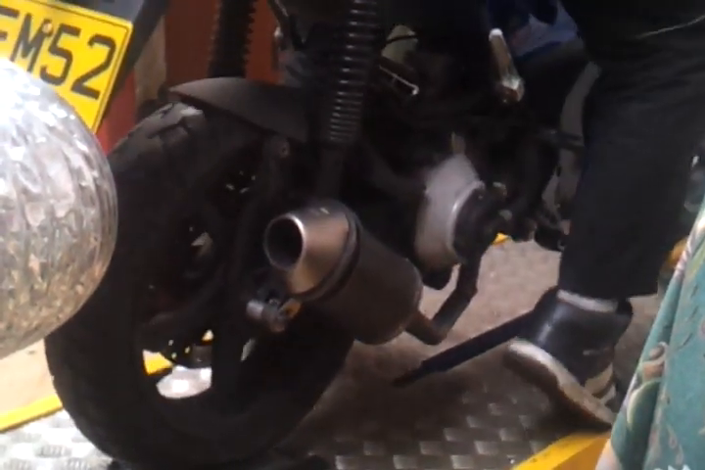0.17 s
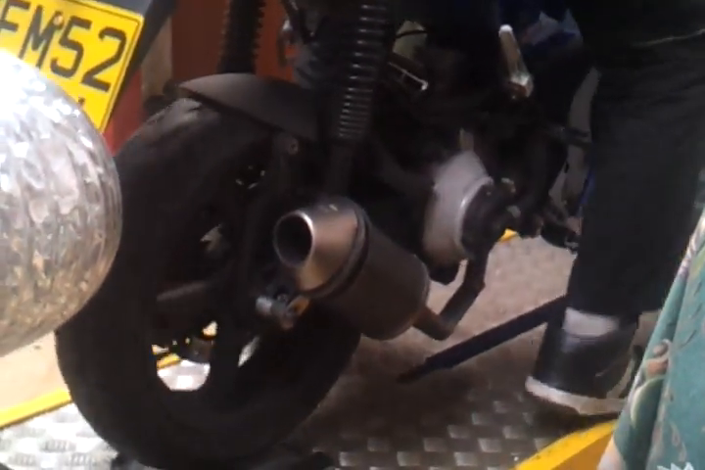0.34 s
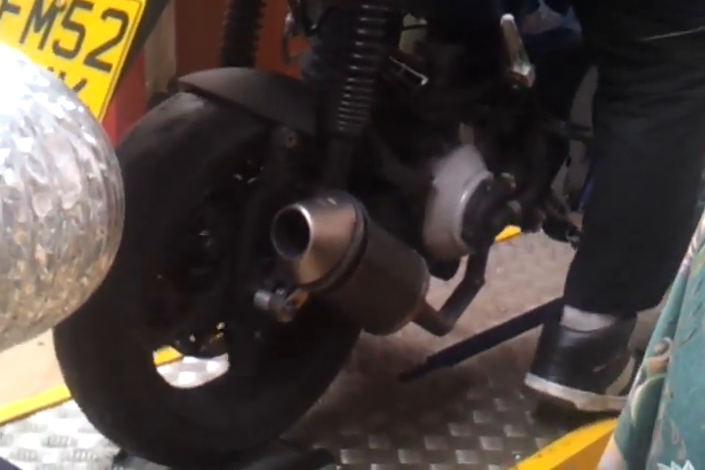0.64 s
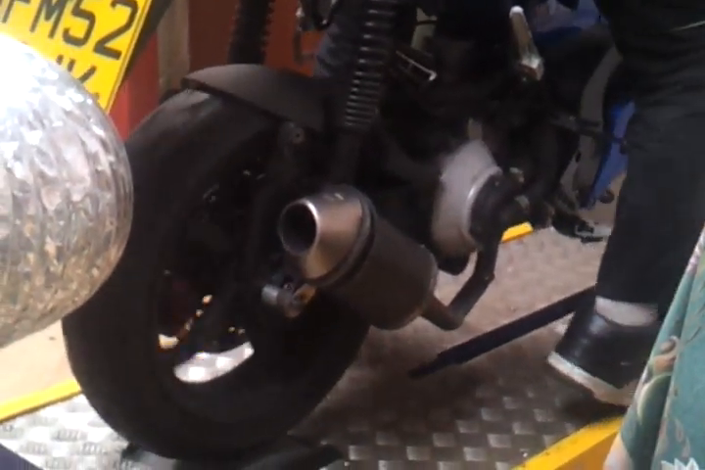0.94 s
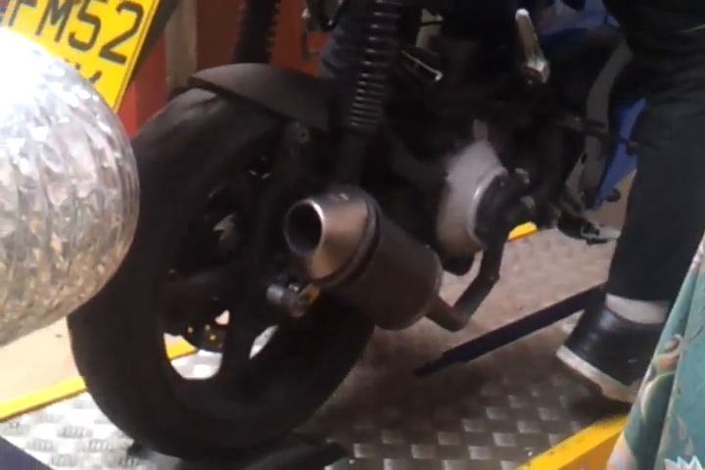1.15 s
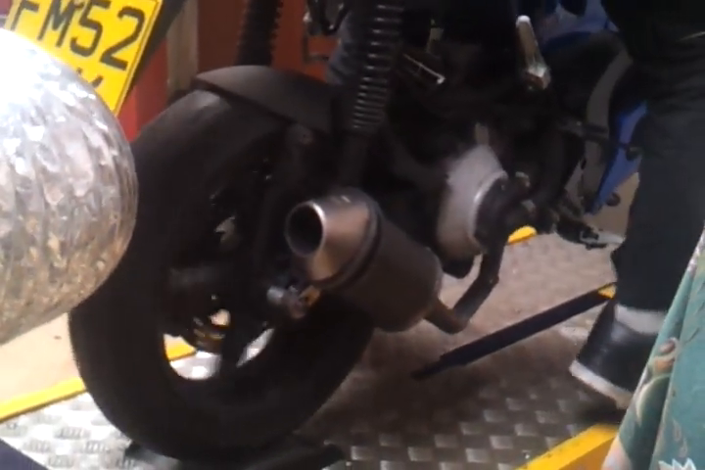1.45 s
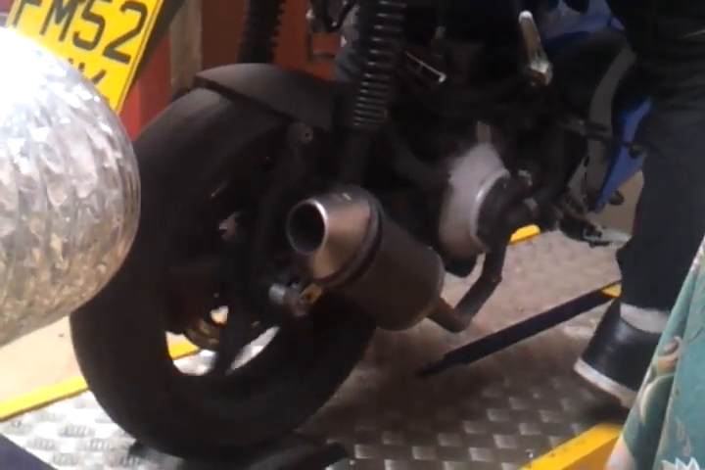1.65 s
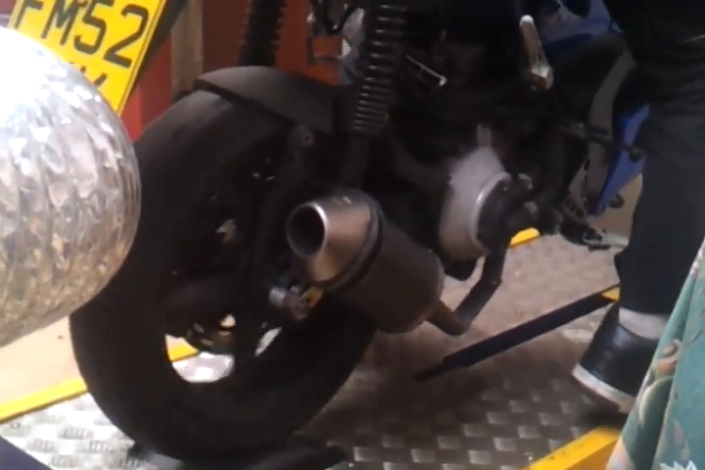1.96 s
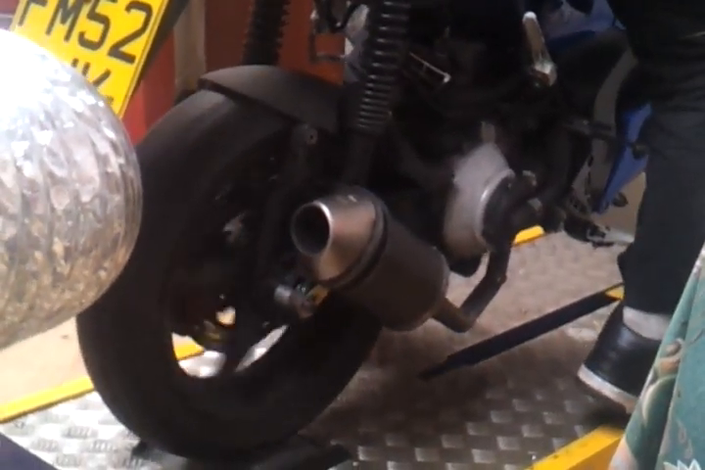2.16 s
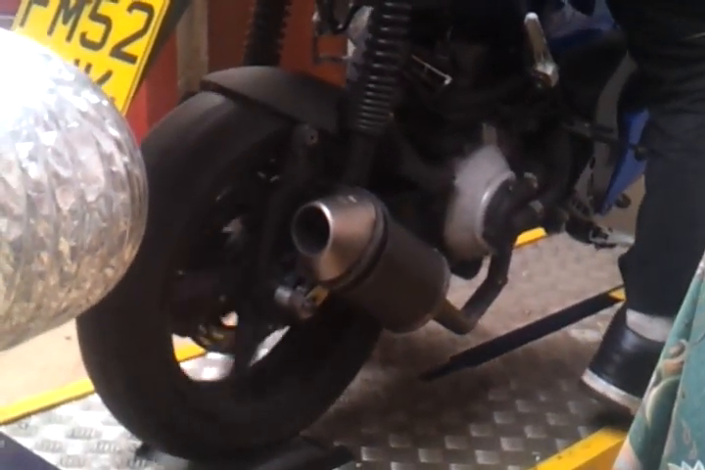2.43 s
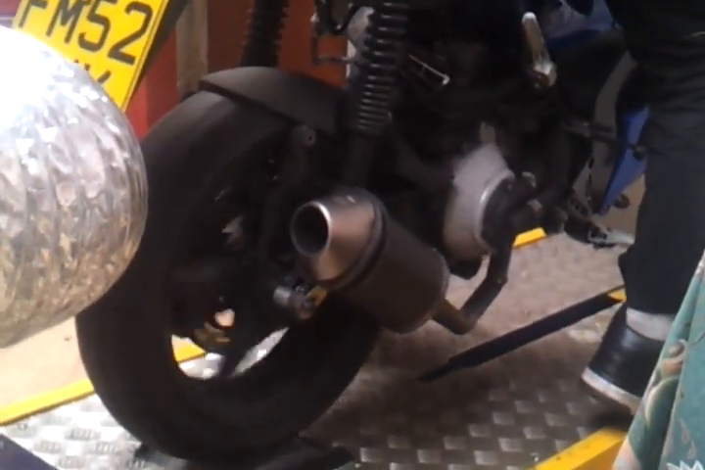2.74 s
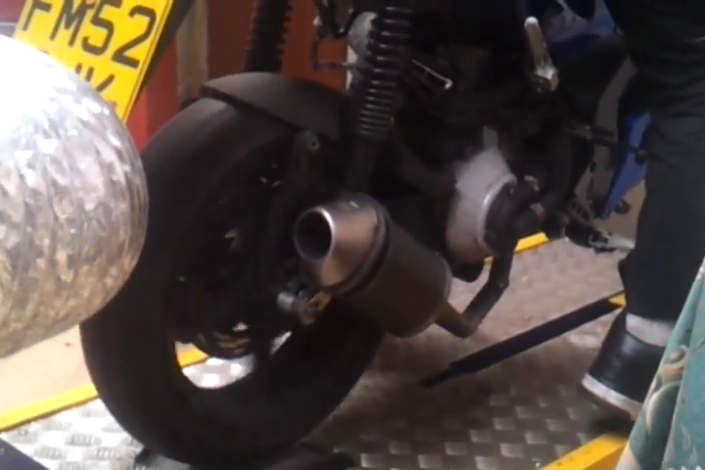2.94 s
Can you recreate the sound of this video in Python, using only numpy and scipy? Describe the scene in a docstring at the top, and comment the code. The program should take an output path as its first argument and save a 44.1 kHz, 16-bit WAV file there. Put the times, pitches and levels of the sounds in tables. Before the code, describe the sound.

A parked motorcycle is revved in four short harsh bursts, dropping to chugging idle between them.

```python
"""A parked single-cylinder motorcycle starts near idle, is blipped four times and sinks back in between.
In each cycle the firing rings the exhaust and lets out a puff of gas, the intake gulps in mid-cycle and
the valves tick; around each blip's start the intake hisses, then the upper exhaust resonances take over.
The microphone is close to the silencer and heavily overloaded, so the revs turn into a harsh rasp."""
import sys
import numpy as np
from scipy import signal
from scipy.fft import rfft, irfft
from scipy.io import wavfile

SR = 44100
rng = np.random.default_rng(int(sys.argv[2]) if len(sys.argv) > 2 else 0)


def file_out(sig):
    """Save sig as 16-bit WAV at sys.argv[1]."""
    # one column per channel
    cols = np.atleast_2d(sig).T
    # limit, then scale
    lim = np.clip(cols, -1, 1)
    pcm = np.round(lim * 32767).astype(np.int16)
    wavfile.write(sys.argv[1], SR, pcm)


N = 136710

# engine speed: (time [s], firings [1/s])
FIRING_RATE = [(0.0, 17.6), (0.24, 17.95), (0.33, 40.3), (0.42, 48.38), (0.53, 47.35), (0.62, 37),
               (0.72, 31.8), (0.8, 24.8), (0.96, 19.7), (1.21, 19.66), (1.31, 39.8), (1.4, 57.9),
               (1.5, 49.8), (1.58, 42.6), (1.72, 29.7), (1.84, 21.6), (2.01, 23.3), (2.12, 43.36),
               (2.24, 48.7), (2.39, 36.6), (2.48, 31.4), (2.6, 21.5), (2.77, 19.8), (2.86, 41.5),
               (2.95, 55.0), (3.1, 43.3)]
# throttle blips: (opens [s], closes [s], exhaust boost [dB], gas boost [dB])
THROTTLE_BLIPS = [(0.239, 0.504, 9, 17.5), (1.203, 1.5, 10.5, 22), (1.991, 2.269, 10.5, 21),
                  (2.765, 3.041, 12.5, 23)]
# exhaust resonances: (centre [Hz], width [Hz], level off throttle [dB], extra at full load [dB])
PIPE_MODES = [(136.6, 19.6, 2.5, -10.5), (209, 32.6, -3, -5.5), (266.6, 27.2, -3.5, -4.5),
              (376, 32, -16.5, 6), (469.7, 94, -22.5, 7.5), (621, 253, -18.5, 6.5), (1390, 900, -30, 10)]
# gas noise spectrum: (frequency [Hz], relative density [dB])
GAS_SPECTRUM = [(30, -22.5), (100, -2), (250, 3.5), (550, -2.5), (900, -11.5), (1600, -9.5), (2600, -16.5),
                (4500, -18.5), (6500, -23.5), (9000, -23.5)]
# valve train noise spectrum: (frequency [Hz], relative density [dB])
VALVE_SPECTRUM = [(300, 8), (900, 4), (1700, -6.5), (2600, -6), (4300, -10), (5600, 2.5), (6600, -2),
                  (9000, -6)]
# valve train knocks: (place in cycle [0-1], level [dB])
VALVE_KNOCKS = [(.14, -2), (0.421, -4.5), (0.621, -13), (.88, -10.5)]
# air sucked in as the throttle snaps open: (start [s], decay time [s], level [dB])
INTAKE_GASPS = [(0.224, .05, -14), (1.194, 0.043, -13), (2.016, 0.044, -11), (2.795, 0.039, -8)]
# intake hiss spectrum: (frequency [Hz], relative density [dB])
GASP_SPECTRUM = [(800, -9.5), (3500, -4), (6300, -1), (9000, -25)]

START_CYCLES = 0.58
OPEN_S, RELEASE_S = 0.096, 0.16
SCATTER_DB, JITTER_S = 2.5, 0.0005  # standard deviations per stroke
EXHAUST_DB, INTAKE_DB, INTAKE_PLACE_CYCLES = 58.5, -9.5, 0.48
GAS_DB, PUFF_S, GAS_STEADY_GAIN = -8.5, 0.008, 0.33
VALVE_DB, VALVE_LOAD_DB, KNOCK_S, VALVE_STEADY_GAIN = -16.5, 15.5, 0.0041, 0.62
DRIVE_DB, CEILING = 6, 0.72
CONVERTER_HZ, LEAK_DB, KNEE_POWER, TOP_HZ = 7000, -31, 8.7, 15750


def exhaust(pulses, load):
    """Pressure pulses ring the pipe; under load the upper resonances take over from the boom."""
    out = np.zeros(N)
    for centre_hz, width_hz, level_db, extra_db in PIPE_MODES:
        gain = undb(EXHAUST_DB + level_db + extra_db * load)
        out += resonate(pulses * gain, centre_hz, width_hz)
    return out


def gas(firings, boost_db):
    """Turbulent noise: a decaying puff after each firing, over a steady flow."""
    flow = fade(firings, PUFF_S) + GAS_STEADY_GAIN
    return noise(GAS_SPECTRUM) * flow * undb(GAS_DB + boost_db)


def valves(turns, load):
    """Impacts as decaying noise over the whirr of the cam chain; both grow with load."""
    knocks = sum(undb(level_db) * strokes(turns, place) for place, level_db in VALVE_KNOCKS)
    envelope = fade(knocks, KNOCK_S) + VALVE_STEADY_GAIN
    return noise(VALVE_SPECTRUM) * envelope * undb(VALVE_DB + VALVE_LOAD_DB * load)


def gasps(t):
    """Inrushing air hisses around the start of each blip: abrupt onset, exponential decay."""
    level = np.zeros(N)
    for start_s, decay_s, level_db in INTAKE_GASPS:
        level += undb(level_db) * (t > start_s) * np.exp(-np.abs(t - start_s) / decay_s)
    return level * noise(GASP_SPECTRUM)


def throttle(t):
    """Load (about 0-1), exhaust boost [dB], gas boost [dB]: each blip ramps open, holds, dies away."""
    controls = np.zeros((3, N))
    for opens_s, closes_s, exhaust_db, gas_db in THROTTLE_BLIPS:
        ramp = np.clip((t - opens_s) / OPEN_S, 0, 1)
        release = np.exp(-np.maximum(t - closes_s, 0) / RELEASE_S)
        controls += np.outer([1, exhaust_db, gas_db], ramp * release)
    return controls


def strokes(turns, place):
    """One impulse per cycle at the given place, with random level and timing."""
    at = np.nonzero(np.diff(np.floor(turns - place)))[0]
    chance = rng.standard_normal((len(at), 2))
    shift = (JITTER_S * SR * chance[:, 0]).astype(int)
    out = np.zeros(N)
    out[np.clip(at + shift, 0, N - 1)] = undb(SCATTER_DB * chance[:, 1])
    return out


def resonate(x, centre_hz, width_hz):
    """Second-order resonance with gain 1 at the centre."""
    b, a = signal.iirpeak(centre_hz, centre_hz / width_hz, fs=SR)
    return signal.lfilter(b, a, x)


def fade(x, decay_s):
    """Give every impulse an exponential tail."""
    return signal.lfilter([1], [1, -np.exp(-1 / (decay_s * SR))], x)


def noise(spectrum):
    """Gaussian noise of rms 1, shaped by dB interpolated over log frequency."""
    hz, db = np.array(spectrum).T
    bin_hz = np.maximum(np.arange(N // 2 + 1) * SR / N, 1)
    gain = undb(np.interp(np.log(bin_hz), np.log(hz), db))
    shaped = irfft(rfft(rng.standard_normal(N)) * gain, N)
    return shaped / shaped.std()


def undb(db):
    """Decibels to amplitude gain."""
    return 10 ** (np.asarray(db) / 20)


def scene():
    """Exhaust, gas and valves follow one engine cycle and throttle; intake hisses have their own times."""
    t = np.arange(N) / SR
    time_s, rate_hz = np.array(FIRING_RATE).T
    turns = START_CYCLES + np.cumsum(np.interp(t, time_s, rate_hz)) / SR
    load, exhaust_db, gas_db = throttle(t)
    firings = strokes(turns, 0)
    gulps = undb(INTAKE_DB) * strokes(turns, INTAKE_PLACE_CYCLES)
    pulses = (firings + gulps) * undb(exhaust_db)
    mix = exhaust(pulses, load) + gas(firings, gas_db) + valves(turns, load) + gasps(t)
    return mix[None]


def record(dry):
    """The microphone saturates; the converter dulls the top, rounds its overshoot, leaks a little treble."""
    squared = CEILING * np.tanh(undb(DRIVE_DB) * dry)
    # run both ways: no phase shift, twice the attenuation
    dull = signal.sosfiltfilt(signal.butter(7, CONVERTER_HZ, fs=SR, output="sos"), squared)
    overshoot = np.abs(dull / (CEILING * 1.224))
    rounded = dull / (1 + overshoot ** KNEE_POWER) ** (1 / KNEE_POWER)
    out = rounded + undb(LEAK_DB) * (squared - dull)
    return signal.sosfilt(signal.ellip(10, 0.1, 80, TOP_HZ, fs=SR, output="sos"), out)


dry = scene()
out = record(dry)
file_out(out)
```